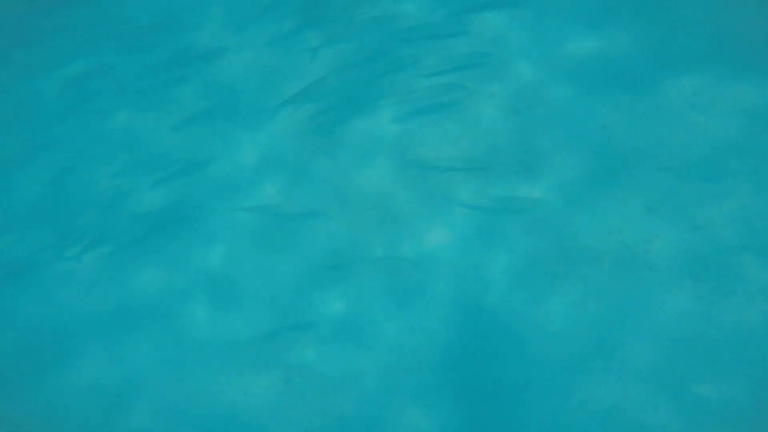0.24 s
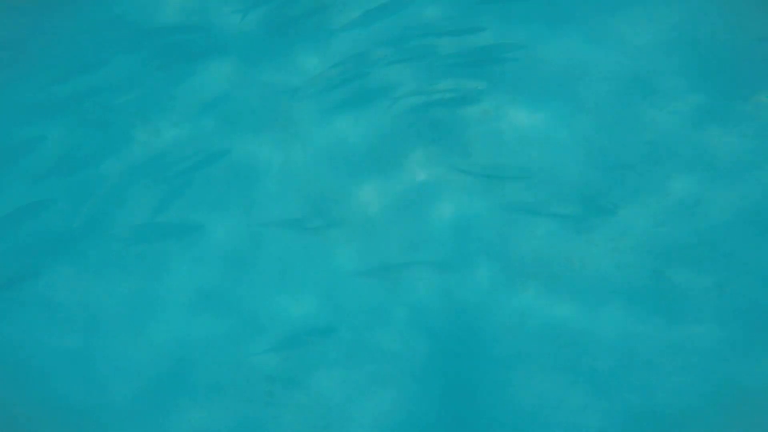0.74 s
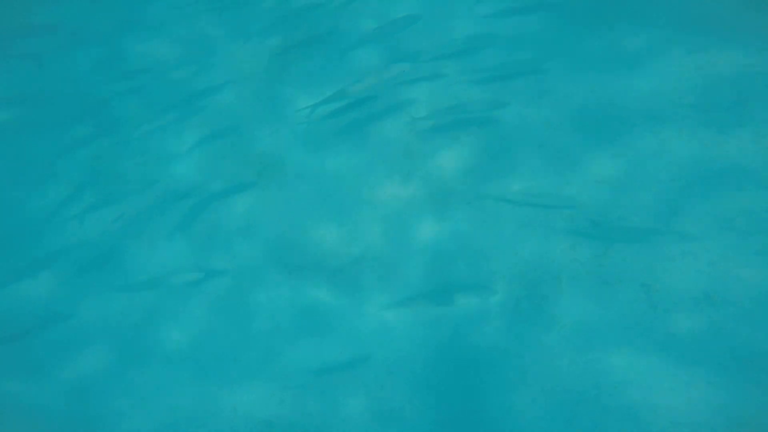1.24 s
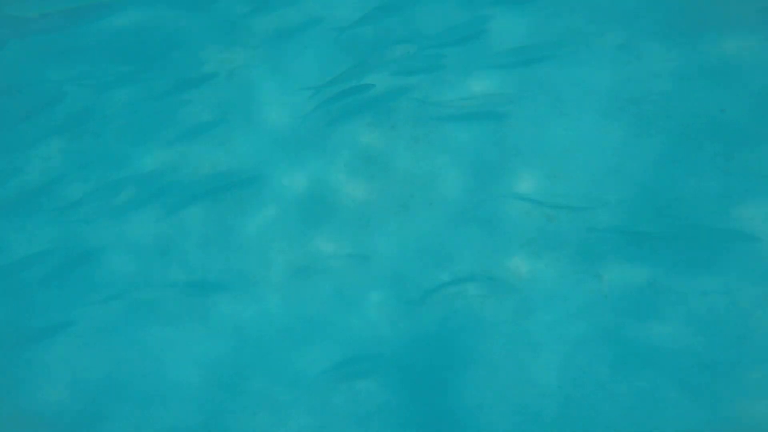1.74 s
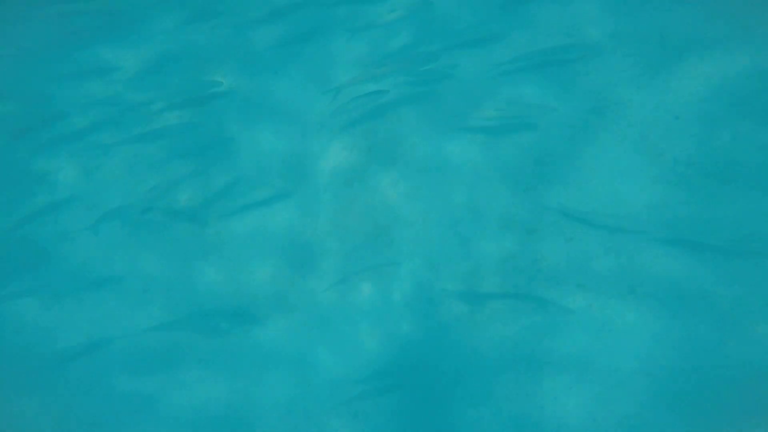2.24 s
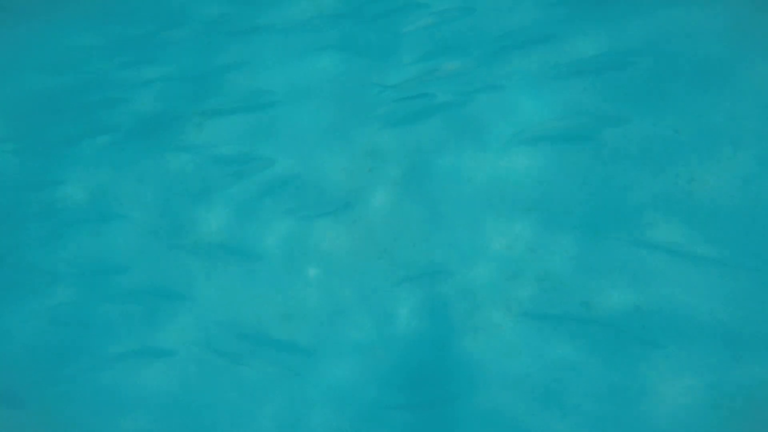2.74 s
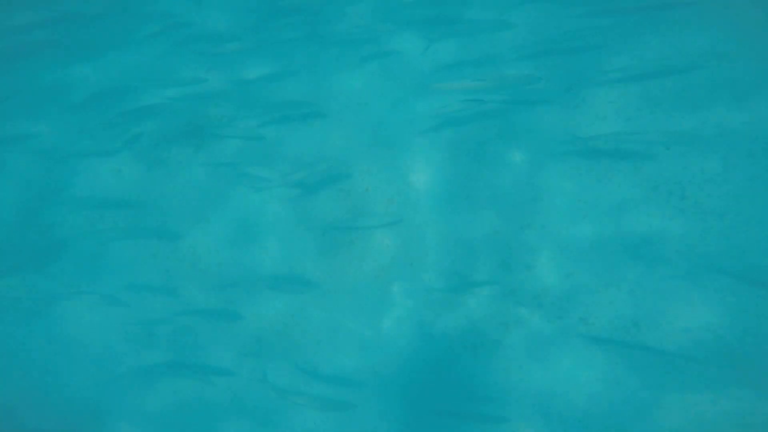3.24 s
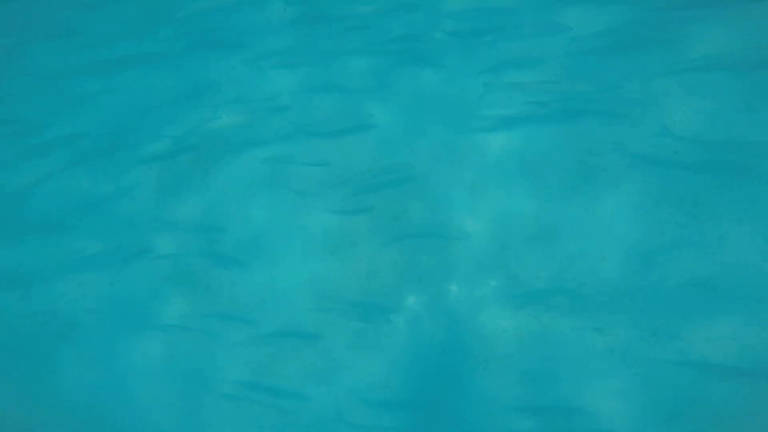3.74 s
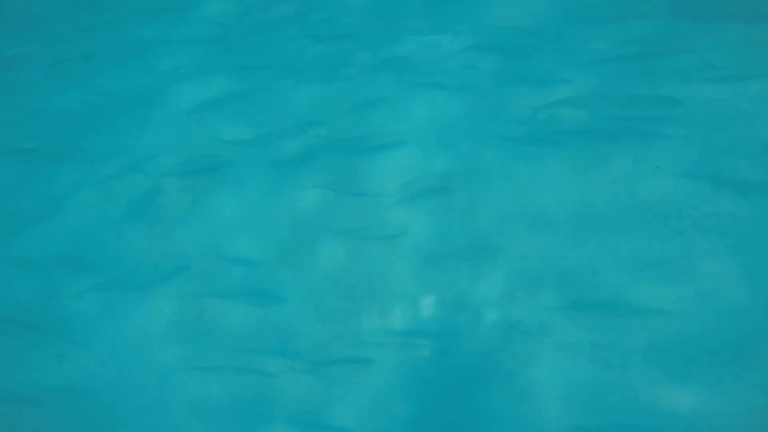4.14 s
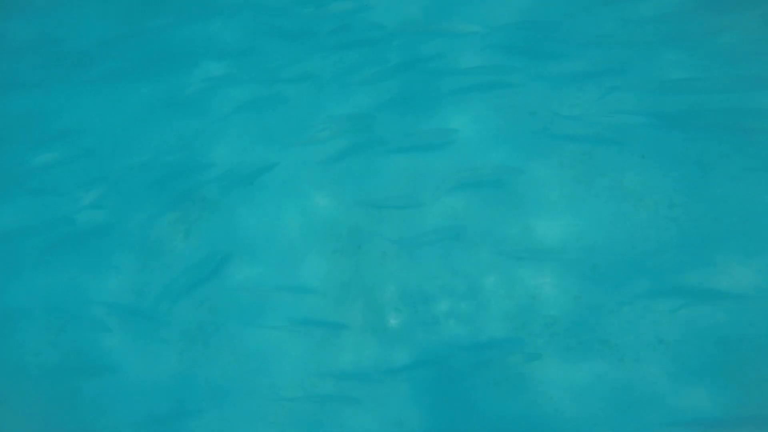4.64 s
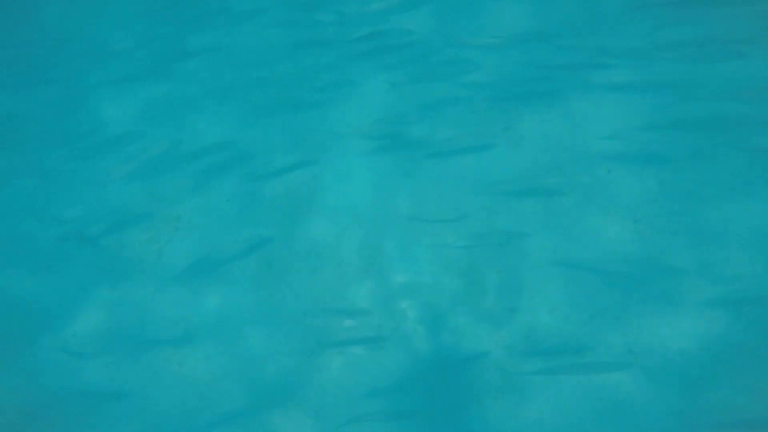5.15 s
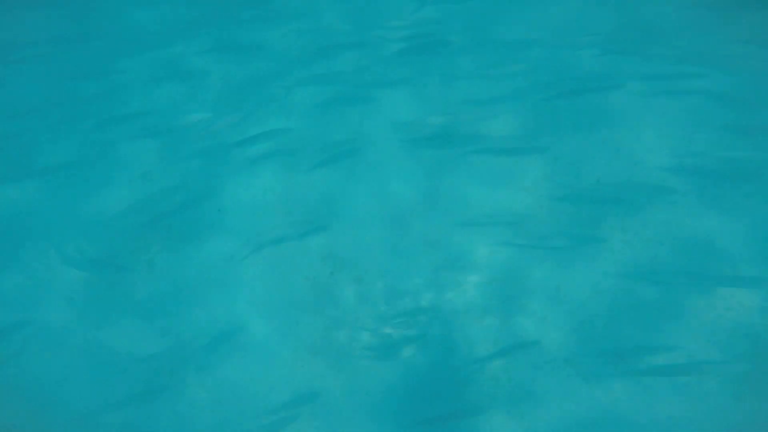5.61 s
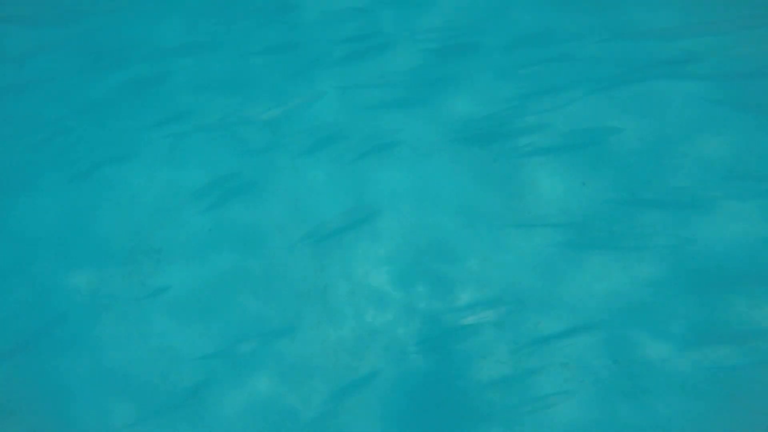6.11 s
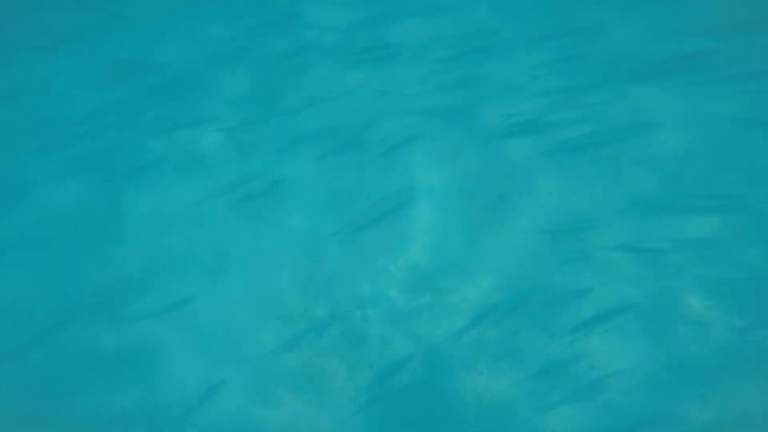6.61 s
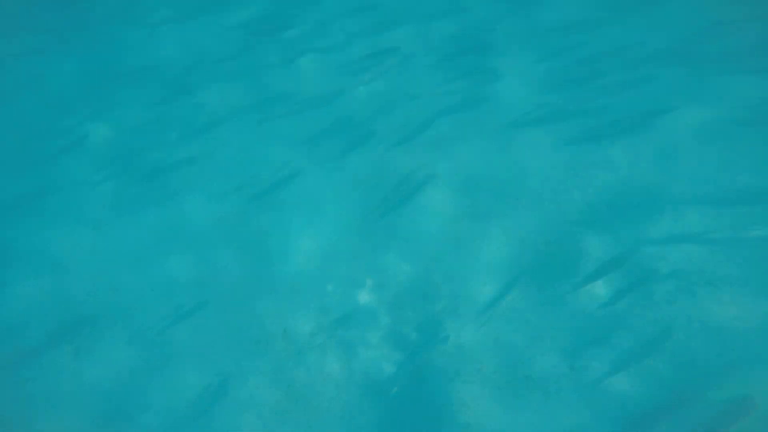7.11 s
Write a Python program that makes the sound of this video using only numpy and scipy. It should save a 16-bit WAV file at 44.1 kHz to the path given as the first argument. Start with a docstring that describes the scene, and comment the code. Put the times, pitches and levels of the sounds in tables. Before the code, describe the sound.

Heard from inside a waterproof camera case underwater, the sound opens with loud bumps, clicks and fingers rubbing on plastic. After about a second it settles into a soft, muffled wash of moving water with a swaying low rumble. Faint ticks are scattered throughout, and brief bubble blips come more often near the end. A thin hum and slight electronic hiss sit underneath.

```python
"""Rubbing skin, knocks and jolts for about a second: hands shift their grip on a camera in a sealed
plastic housing under water. Then the water sways it on its mount and dull flow noise rings the
shell's modes. Small ticks and a few rising bubbles pass, two thin hums come and go, and the
electronics hiss and whine faintly."""
import sys
import numpy as np
from scipy import signal
from scipy.fft import rfft, irfft, next_fast_len
from scipy.io import wavfile
from scipy.ndimage import uniform_filter1d

SR = 44100
rng = np.random.default_rng(int(sys.argv[2]) if len(sys.argv) > 2 else 0)


def store_pcm(level_fs):
    """Save levels as 16-bit WAV."""
    pcm = np.round(np.clip(level_fs, -1, 1) * 32767).astype(np.int16)
    wavfile.write(sys.argv[1], SR, np.atleast_2d(pcm).T)


N = 325017

# preamplifier hiss spectrum: (frequency [Hz], relative density [dB])
HISS_SPECTRUM = [(100, 5), (1000, -1.5), (4500, 6.5), (7000, 1), (8800, -0.5), (10000, -1.5), (14000, -3.5),
                 (15300, -10)]
# clock tones: (cycles per sensor frame)
CLOCK_CYCLES = [185.5, 210.5, 421]
# faint whine tones: (relative level [dB])
CLOCK_DB = [-88, -80, -84]
# hum resonances: (frequency [Hz], width [Hz], gain [dB], cancelled by normalising)
HUM_MODES = [(1138, 100, 0), (1420, 160, -1)]
# hum envelopes: (time [s], lower hum [dB], upper hum [dB])
HUM_LEVELS = [(0, -74, -79), (3.2, -65.5, -78.5), (4.2, -74.5, -73), (7.37, -71.5, -64.5)]
# free shell: (frequency [Hz], width [Hz], relative gain [dB])
SHELL_MODES = [(298.5, 88, -11), (400, 290, -8.5), (581, 263, 3.5), (610, 64, 2), (700, 130, -14.5),
               (845, 127, -8.5), (1270, 170, -20.5), (1413, 296, -11), (1563, 38, -12.5), (1864, 232, -5.5),
               (2080, 140, -11), (2257, 430, -15), (2730, 420, -14.5), (2900, 260, -15.5),
               (3340, 890, -24.5), (3920, 250, -23), (4126, 140, -25.5)]
# shell pressed by hands: (frequency [Hz], width [Hz], relative gain [dB])
HELD_MODES = [(229, 40, 6.5), (390, 350, 0.5), (596, 170, 1.5), (720, 197, -1), (920, 90, -8.5),
              (1547, 880, -4), (1744, 200, 0), (2270, 450, -9), (2560, 360, -7.5), (2740, 270, -11),
              (3350, 900, -18), (4010, 860, -16), (4390, 540, -21.5)]
# sway, rock, buffet on the mount: (frequency [Hz], width [Hz], gain [dB], cancelled by normalising)
MOUNT_MODES = [(28.3, 38.8, -4), (70.1, 31, 6), (109.2, 36.6, 20)]
# sway by the water: (time [s], level [dB])
SWAY_LEVELS = [(0, -29), (.5, -28), (.96, -23), (1.3, -33.5), (1.7, -30), (2.4, -35), (4.0, -33),
               (4.7, -40), (5.4, -34), (5.87, -40.5), (6.42, -31.5), (6.75, -38), (7.0, -33.5),
               (7.37, -37.5)]
# buffeting by the water: (time [s], level [dB])
BUFFET_LEVELS = [(0, -40), (1.0, -52.5), (1.5, -68), (2.4, -54), (4.0, -45), (4.8, -51.5), (5.9, -48.5),
                 (6.5, -68), (7.37, -59)]
# rising bubbles: (time [s], level [dB], start pitch [Hz])
BUBBLES = [(.058, -34, 2280), (.07, -42, 2150), (0.09, -37.5, 2160), (2.9657, -26.5, 1840),
           (5.12, -46, 1350), (5.144, -36.5, 400), (5.17, -46.5, 244), (5.215, -50, 273), (6.046, -45, 477),
           (6.507, -42.5, 2160), (6.524, -50, 4300), (6.53, -51, 3700), (6.617, -41.5, 300),
           (6.647, -43.5, 362), (6.898, -41, 1870), (7.009, -45, 4170), (7.013, -45, 2950),
           (7.035, -52, 4100), (7.08, -47, 2210), (7.103, -47, 4000), (7.115, -43, 1800), (7.13, -41, 2250),
           (7.14, -45, 2150), (7.244, -50, 4200)]
# snaps through a vent: (time [s], peak [dB], centre [Hz], relative treble [dB], t60 [s])
VENT_SNAPS = [(.219, -40, 3970, -45, 0.013), (0.2773, -31.5, 4200, -33, 0.0096),
              (0.7413, -21, 3040, -32, 0.037), (0.763, -14.5, 2680, -43, 0.051),
              (0.773, -22, 2500, -31, 0.12), (0.785, -30, 2870, -36, 0.12), (0.8, -42, 4200, -19, 0.051),
              (1.396, -38, 4060, -14, 0.019), (3.505, -39, 2750, -40, 0.05), (4.1365, -47, 8900, -45, .02),
              (7.32, -34.5, 3760, -11, 0.018)]
# skin on the shell: (start [s], length [s], first level [dB], last level [dB], lower-mode boost [dB])
SKIN_STROKES = [(0.136, .05, -77, -68, 17), (0.176, 0.047, -53.5, -38.5, 10), (.235, 0.026, -66, -41, 16),
                (0.313, 0.046, -68, -53, 18.5), (0.337, 0.097, -52, -52, 2),
                (0.517, 0.14, -52.5, -47.5, 0.3), (0.651, 0.047, -41.5, -44, -0.5),
                (0.705, 0.072, -54, -46, -1), (0.795, 0.15, -43.5, -65, 5), (0.996, .045, -53.5, -59.5, 11),
                (1.064, 0.098, -57, -44, 11.5)]
# contacts on the shell: (time [s], peak [dB], contact centre [Hz], contact decay [s])
SHELL_KNOCKS = [(0.127, -29, 610, 0.0087), (0.214, -30.5, 1840, .004), (0.258, -30, 1980, .004),
                (0.2672, -9.5, 2650, .0025), (.271, -2.5, 640, 0.0019), (.277, -5, 720, 0.0022),
                (.268, -18.5, 3870, 0.0045), (0.277, -20, 2400, 0.0037), (.339, -32.5, 2340, .003),
                (.34, -26, 700, .005), (0.359, -40, 2750, .001), (0.766, -19.5, 583, 0.0042),
                (0.781, -18.5, 570, .007), (1.049, -22.5, 490, 0.0018), (1.135, -29, 450, 0.0027),
                (1.151, -31, 480, .005), (2.385, -42, 310, 0.055), (2.48, -44.5, 320, 0.071),
                (4.118, -32, 400, 0.0089), (5.143, -34, 327, 0.0047), (6.102, -37, 416, 0.035),
                (6.15, -37, 400, 0.016), (7.32, -38, 2300, .004)]
# jolts of the whole camera: (time [s], peak [dB], swing [Hz])
CAMERA_JOLTS = [(0.004, -16, 38), (0.246, -8.5, 57), (0.273, -3.5, 133.6), (0.28, -1, 91.3),
                (0.297, -10, 74), (0.344, -12.5, 132.4), (0.365, -16, 39.8), (0.386, -20, 41.4),
                (0.536, -11.5, 43), (0.64, -15.5, 45.3), (0.758, -15, 40.4), (0.807, -19.5, 41),
                (0.85, -13.5, 52.4), (0.877, -14, 45.3), (1.009, -11.5, 50.7), (1.05, -10.5, 71.3),
                (1.088, -15.5, 57.6), (1.118, -13.5, 74.3), (1.136, -22.5, 40), (4.118, -23, 42.7)]

TIME_S = np.arange(N) / SR


def amp(db):
    """Decibels to gain."""
    return 10 ** (np.asarray(db) / 20)


def unit_rms(x):
    """Scales to rms 1."""
    return x / np.sqrt(np.mean(x ** 2) + 1e-20)


def at_peak(x, peak_db):
    """Scales to a peak level."""
    return amp(peak_db) * x / abs(x).max()


def add(mix, start_s, sound):
    """Mixes a sound in at start_s."""
    part = mix[round(start_s * SR):][:len(sound)]
    part += sound[:len(part)]


def shaped_noise(response):
    """White noise filtered by a gain function of Hz."""
    size = 2 * next_fast_len(N // 2 + SR // 20)
    hz = np.fft.rfftfreq(size, 1 / SR) + 1
    return irfft(rfft(rng.standard_normal(N), size) * response(hz), size)[:N]


def drift(cutoff_hz):
    """Low-passed random motion, rms 1."""
    return unit_rms(shaped_noise(lambda hz: 1 / (1 + (hz / cutoff_hz) ** 2)))


def ring(modes, drive, tilt_db_per_oct=0, order=3):
    """Drives steep-skirted modes whose powers add."""
    f = np.fft.rfftfreq(2 ** 14, 1 / SR) + 1
    power = 0
    for hz, width_hz, db in modes:
        gain = amp(db + tilt_db_per_oct * np.log2(hz / 1000))
        detuning = (hz ** 2 - f ** 2) / (f * width_hz)
        power += gain ** 2 / (1 + detuning ** 2) ** order
    # fold the cepstrum: minimum phase
    cepstrum = irfft(np.log(power + 1e-14) / 2)
    cepstrum[1:len(f) - 1] *= 2
    cepstrum[len(f):] = 0
    impulse = irfft(np.exp(rfft(cepstrum)))[:len(f)]
    return signal.fftconvolve(drive, impulse)[:len(drive)]


def ring_halves(modes, envelope, split_hz=1020):
    """Lower and upper modes, each rung by its own noise under one envelope, rms 1."""
    lower = [mode for mode in modes if mode[0] <= split_hz]
    upper = [mode for mode in modes if mode[0] > split_hz]
    return [unit_rms(ring(half, envelope * rng.standard_normal(N))) for half in (lower, upper)]


def electronics(hiss_db=-68, frame_hz=30000 / 1001):
    """Preamplifier hiss; clock tones restart each sensor frame, an odd half cycle splitting the line."""
    hz, density_db = np.transpose(HISS_SPECTRUM)
    hiss = shaped_noise(lambda f: amp(np.interp(np.log(f), np.log(hz), density_db)))
    frame_phase = TIME_S * frame_hz % 1
    whine = sum(amp(db + 6) * np.sin(2 * np.pi * cycles * frame_phase)
                for cycles, db in zip(CLOCK_CYCLES, CLOCK_DB))
    return amp(hiss_db) * unit_rms(hiss) + whine


def hums():
    """Noise in two narrow modes, each swelling and fading."""
    times_s, *levels_db = np.transpose(HUM_LEVELS)
    return sum(unit_rms(ring([mode], rng.standard_normal(N))) * amp(np.interp(TIME_S, times_s, db))
               for mode, db in zip(HUM_MODES, levels_db))


def crackle(ticks_per_s=9):
    """Faint ticks scattered in the water, random in time, pitch and level."""
    out, t = np.zeros(N), np.arange(SR // 50) / SR
    for when, pitch, faintness in rng.random((round(ticks_per_s * N / SR), 3)):
        hz = 2200 * 2.6 ** pitch
        burst = rng.standard_normal(len(t)) * np.exp(-t / .003)
        tick = ring([(hz, .4 * hz, 0)], burst, order=2)
        peak_db = -62 - 3 * np.log(faintness + .036)
        add(out, when * N / SR, at_peak(tick, peak_db))
    return out


def mount_rumble():
    """Water pushes each mode of the mount; rocking follows the sway."""
    sway_db = np.interp(TIME_S, *np.transpose(SWAY_LEVELS))
    rock_db = -44.5 + .73 * (sway_db + 36)
    buffet_db = np.interp(TIME_S, *np.transpose(BUFFET_LEVELS))
    return sum(unit_rms(ring([mode], rng.standard_normal(N))) * amp(db)
               for mode, db in zip(MOUNT_MODES, (sway_db, rock_db, buffet_db)))


def flow(first_db=-43.5, settled_db=-53, settle_s=4.3, upper_db=-58.5):
    """Flow noise, lumpy with eddies, rings the shell; the lower modes settle to a quieter level."""
    eddies = amp(1.57 * drift(cutoff_hz=25.6))
    lower, upper = ring_halves(SHELL_MODES, eddies)
    lower_db = settled_db + (first_db - settled_db) * np.exp(-TIME_S / settle_s)
    lull_db = -6.5 * np.exp(-((TIME_S - .47) / .12) ** 2)  # brief dip as a hand muffles the shell
    return amp(lull_db) * (amp(lower_db) * lower + amp(upper_db) * upper)


def bubbles(rise_oct_per_s=4.65, t60_cycles=52):
    """A damped, wobbling sine climbs as the bubble rises; the splutter that frees it rings the shell."""
    out, t = np.zeros(N), np.arange(SR // 4) / SR
    for start_s, level_db, hz in BUBBLES:
        cycles = np.cumsum(hz * 2 ** (rise_oct_per_s * t)) / SR
        splutter = unit_rms(ring(SHELL_MODES, rng.standard_normal(len(t)), tilt_db_per_oct=-7))
        wobble = 1 + .5 * unit_rms(uniform_filter1d(rng.standard_normal(len(t)), round(3 * SR / hz)))
        voice = wobble * np.sin(2 * np.pi * cycles) + amp(-3) * splutter
        envelope = amp(level_db - 60 * t * hz / t60_cycles) * (1 - np.exp(-t / .0008))
        add(out, start_s, envelope * voice)
    return out


def snaps():
    """Sharp bursts, a broad hump plus treble, pass through a vent and also ring the shell."""
    out, t = np.zeros(N), np.arange(SR // 6) / SR
    for start_s, peak_db, hz, treble_db, t60_s in VENT_SNAPS:
        burst = rng.standard_normal(len(t)) * amp(-60 * t / t60_s) * (1 - np.exp(-t / .00005))
        direct = ring([(hz, .79 * hz, 0), (10500, 15000, treble_db)], burst, order=2)
        shell = amp(31) * ring(SHELL_MODES, direct, tilt_db_per_oct=-5.5)
        add(out, start_s, at_peak(direct + shell, peak_db))
    return out


def skin_rub(attack_s=.008, release_db_per_s=900):
    """Stick and slip: clumped noise rings the held shell."""
    clumps = amp(2.5 * drift(cutoff_hz=90))
    lower, upper = ring_halves(HELD_MODES, clumps)
    out = np.zeros(N)
    for start_s, length_s, first_db, last_db, boost_db in SKIN_STROKES:
        t = TIME_S - start_s
        attack = np.clip(t / attack_s, 0, 1)
        slide_db = first_db + (last_db - first_db) * np.clip(t / length_s, 0, 1)
        release_db = release_db_per_s * np.clip(t - length_s, 0, 1)
        out += attack * amp(slide_db - release_db) * (upper + amp(boost_db) * lower)
    return out


def knocks(let_go_s=1.3):
    """A short rough contact rings the shell: held until let_go_s, then free."""
    out, t = np.zeros(N), np.arange(SR // 8) / SR
    for start_s, peak_db, hz, decay_s in SHELL_KNOCKS:
        burst = rng.standard_normal(len(t)) * np.exp(-t / decay_s) * (1 - np.exp(-t / .00029))
        contact = ring([(hz, .5 * hz, 0)], burst, order=2)
        modes = HELD_MODES if start_s < let_go_s else SHELL_MODES
        add(out, start_s, at_peak(ring(modes, contact, tilt_db_per_oct=.5), peak_db))
    return out


def jolts(soft_t60_s=.13, hard_above_db=-4):
    """A push, then a damped swing on the mount; the hand stops hard jolts sooner."""
    out, t = np.zeros(N), np.arange(SR // 3) / SR
    for start_s, peak_db, hz in CAMERA_JOLTS:
        t60_s = soft_t60_s * (.42 if peak_db > hard_above_db else 1)
        envelope = amp(-60 * t / t60_s) * (1 - np.exp(-t / .003))
        add(out, start_s, at_peak(envelope * np.sin(2 * np.pi * hz * t), peak_db))
    return out


def scene():
    """Mono sum inside the housing."""
    background = mount_rumble() + flow() + hums()
    handling = skin_rub() + jolts() + knocks()
    return (background + handling + snaps() + bubbles() + crackle() + electronics())[None]


def record(dry, ceiling=.97, cutoff_hz=15300):
    """Soft input clipping of the loudest peaks, then a low-pass."""
    clipped = dry / (1 + abs(dry / ceiling) ** 9) ** (1 / 9)
    lowpass = signal.firwin(511, cutoff_hz, window=("kaiser", 9), fs=SR)
    return signal.oaconvolve(clipped, lowpass[None], "same")


dry = scene()
out = record(dry)
store_pcm(out)
```